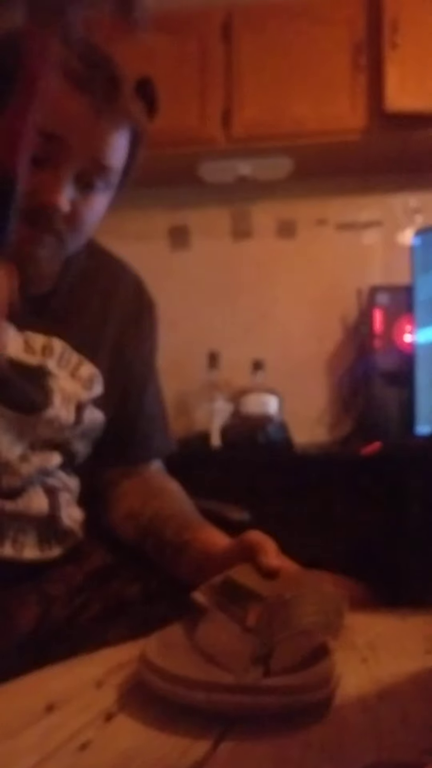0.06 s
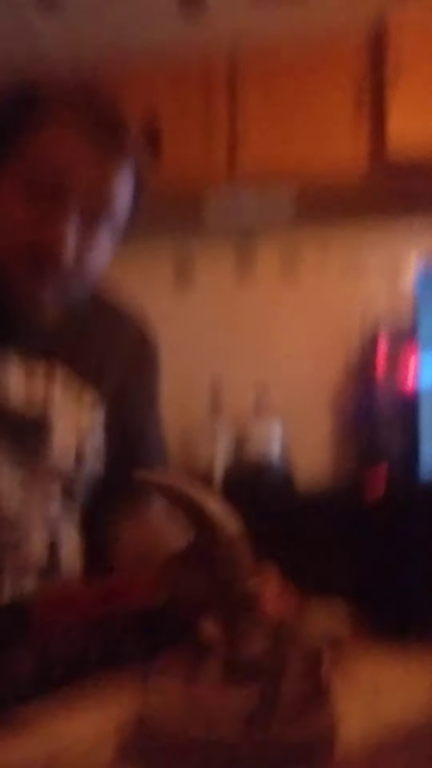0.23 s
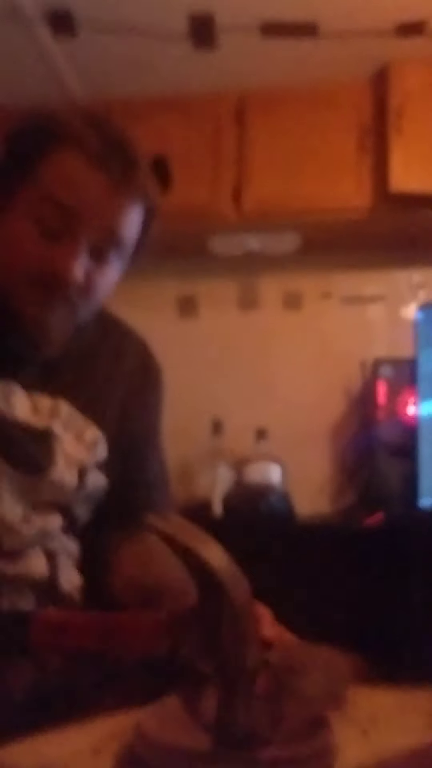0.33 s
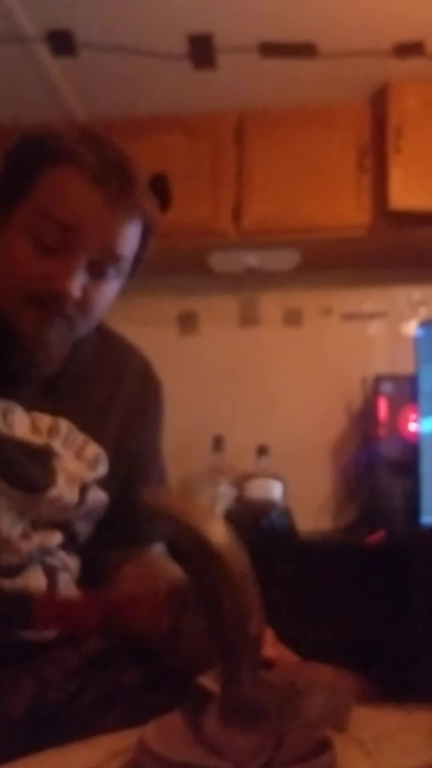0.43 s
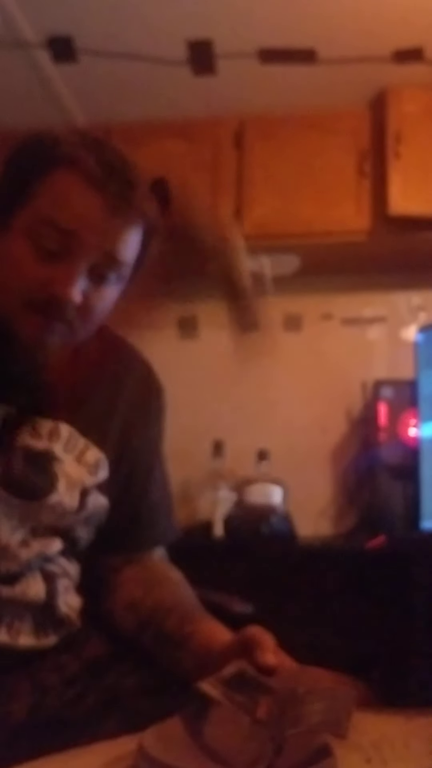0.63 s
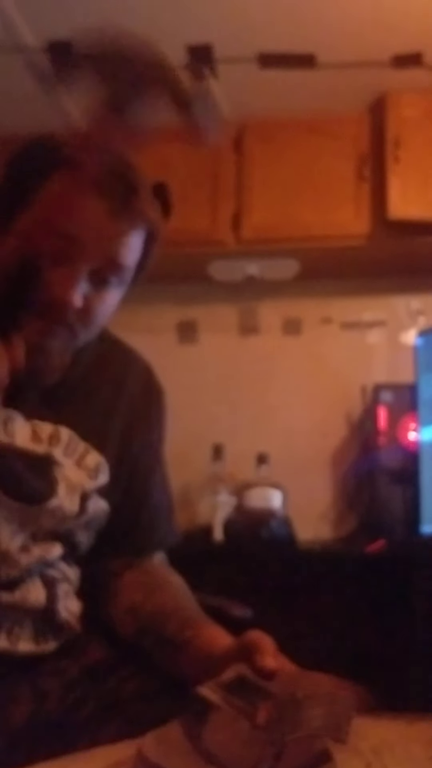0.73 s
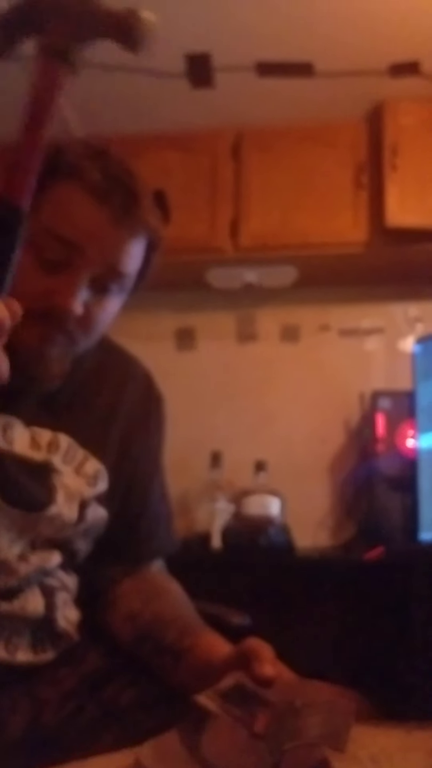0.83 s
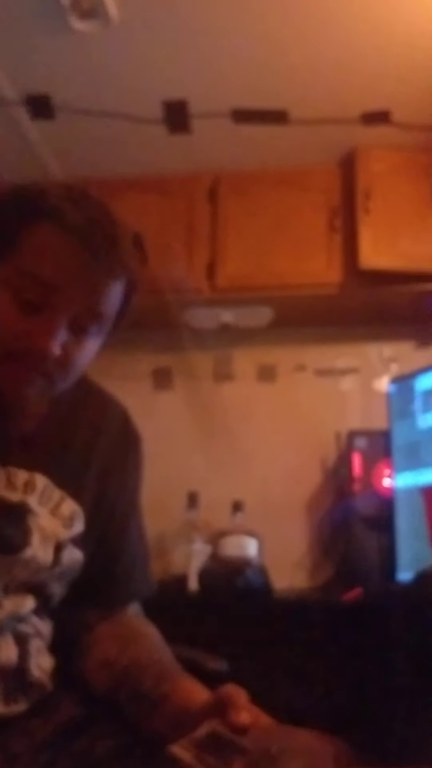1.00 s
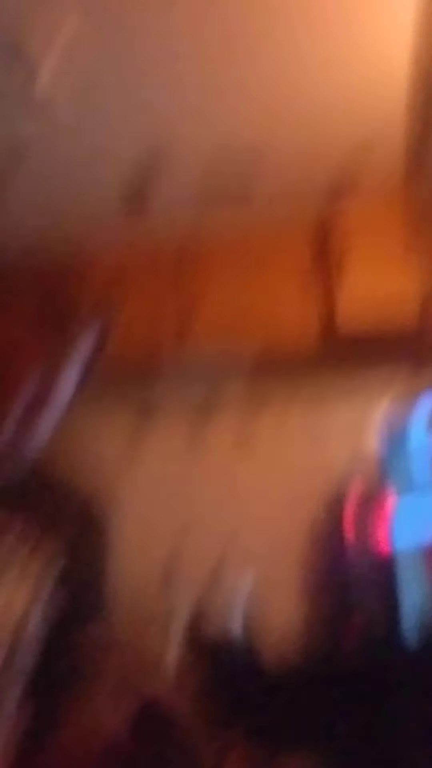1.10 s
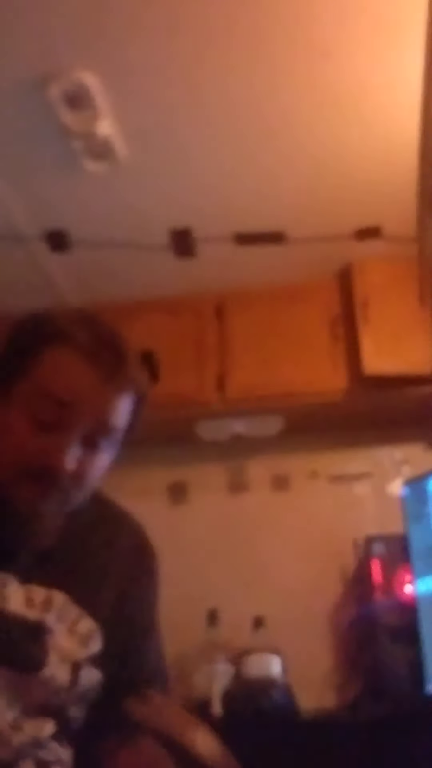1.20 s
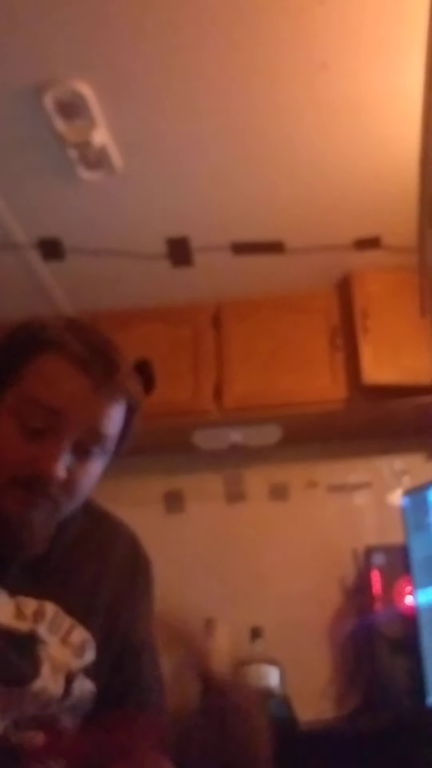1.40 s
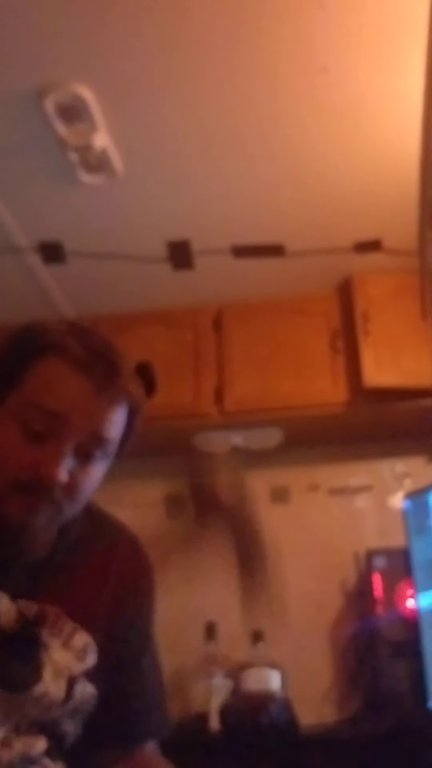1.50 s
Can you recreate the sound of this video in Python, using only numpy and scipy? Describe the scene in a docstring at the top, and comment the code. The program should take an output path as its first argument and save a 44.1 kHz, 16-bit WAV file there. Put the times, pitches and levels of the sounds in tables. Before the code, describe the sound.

A hammer hits a rubber sandal on a wooden table at about 0.2 seconds, a close, sharp slapping thud with a short boom in the small room. Loose things tick and bump faintly as they settle. A second, similar blow lands at about 1.1 seconds, followed by light rattling that dies away by 1.5 seconds. A faint low room rumble runs underneath.

```python
"""A small quiet kitchen: close by, a hammer comes down twice on a rubber sandal on a wooden table.
Each impact slaps the sole and drives the table's normal modes with two pushes, the second as the
sole bottoms out. Boards and near walls clatter, the room's standing waves boom, small metal rings.
Loose things then tick and bump softly as they settle, over a low steady room rumble."""
import sys
import numpy as np
from scipy import signal
from scipy.fft import rfft, irfft, next_fast_len
from scipy.io import wavfile
from scipy.ndimage import uniform_filter1d

SR = 44100
rng = np.random.default_rng(int(sys.argv[2]) if len(sys.argv) > 2 else 0)


def wav_record(signal):
    """Record a signal, one row per channel, as 16-bit PCM in the file named by sys.argv[1]."""
    frames = np.transpose(np.atleast_2d(signal))
    bounded = np.clip(frames, -1, 1)
    # unit amplitude maps onto the largest positive 16-bit level
    quanta = np.round(bounded * 32767).astype(np.int16)
    wavfile.write(sys.argv[1], SR, quanta)


N = 68355
T = np.arange(N) / SR
BANDS_HZ = 31.25 * 2 ** (np.arange(28) / 3)


def undb(db):
    """Amplitude ratio of a level in decibels."""
    return 10 ** (np.asarray(db) / 20)

def pan(db):
    """Interaural level difference: two gains, the left `db` above the right."""
    return undb(np.array([[db], [-db]]) / 2)

def band_values(table, column=1):
    """A table column interpolated at the band centres on a log-frequency axis."""
    table = np.array(table, float)
    return np.interp(np.log(BANDS_HZ), np.log(table[:, 0]), table[:, column])

def fade(t60, hold_s=0):
    """Exponential decay after a hold: 60 dB in t60 seconds."""
    return np.exp(-np.log(1000) * np.maximum(T - hold_s, 0) / t60)

def rise(seconds):
    """Smooth onset: the complement of a Gaussian."""
    return 1 - np.exp(-(T / seconds) ** 2)

def delayed(x, seconds):
    """Pure time delay."""
    k = round(seconds * SR)
    return np.concatenate([np.zeros(x.shape[:-1] + (k,)), x[..., :N - k]], axis=-1)

def noise_bands(coherent_hz=690, bass_correlation=0.83):
    """Unit third-octave noises (bands x 2 x N); interaural coherence falls above coherent_hz."""
    size = next_fast_len(N)
    hz = np.maximum(np.arange(size // 2 + 1) * SR / size, 1)
    mid, side = rfft(rng.standard_normal((2, size)))
    coherence = bass_correlation / (1 + (hz / coherent_hz) ** 4)
    ears = np.sqrt(1 + coherence) * mid + np.sqrt(1 - coherence) * side * np.array([[1], [-1]])
    passbands = np.cos(np.pi / 2 * np.clip(3 * np.log2(hz / BANDS_HZ[:, None]), -1, 1)) ** 2
    bands = irfft((passbands[:, None] * ears).astype(np.complex64), size)[..., :N]
    return bands / bands.std(axis=(1, 2), keepdims=True)

def colour(bands, db):
    """Spectral shaping: the bands summed at the given levels."""
    return np.tensordot(undb(db).astype(np.float32), bands, 1)

def ring(modes):
    """Free vibration: a superposition of damped modes (f/Hz, level/dB, T60/s)."""
    return sum(undb(db) * np.sin(2 * np.pi * hz * T) * fade(t60) for hz, db, t60 in modes)

def room_rumble(rms_db=-57):
    """Stationary background noise with its energy in the bass."""
    # spectral density of the rumble: f/Hz, relative level/dB
    density = [(30, 0.5), (60, 4.5), (100, -2), (160, -4), (250, -7), (330, -17), (480, -13), (750, -30),
               (1200, -37), (2200, -34), (3200, -44.5), (6000, -43), (8500, -63), (16000, -65)]
    bandwidth_db = 10 * np.log10(BANDS_HZ)
    rumble = colour(noise_bands(coherent_hz=1200), band_values(density) + bandwidth_db)
    return undb(rms_db) * rumble / rumble.std()

def sole_slap(bands, tilt):
    """Impact of hammer on rubber: a broadband transient and a crack of heavily damped modes."""
    # spectrum of the slap: f/Hz, band level/dB
    spectrum = [(100, -45.5), (300, -27), (900, -11.5), (1600, -11.5), (2700, -6.5), (4500, -12.5),
                (6500, -20.5), (8500, -30.5), (12500, -8.5), (16000, -21.5)]
    # crack of the hammer face on the sole: f/Hz, level/dB, T60/s
    crack_modes = [(2640, -7.5, 0.011), (2947, -5, 0.0084), (4476, -12, .012)]
    burst = colour(bands, band_values(spectrum) + tilt) * fade(t60=0.0077)
    return (burst + ring(crack_modes)) * rise(0.0021) * pan(-15)

def lumps(depth_db=1.5, steps_per_s=500):
    """Random amplitude modulation of unit mean power."""
    step = int(SR / steps_per_s)
    stairs = np.repeat(rng.standard_normal(N), step)[:N]
    gain = undb(depth_db * uniform_filter1d(stairs, step))
    return gain / np.sqrt(np.mean(gain ** 2))

def clatter(bands, tilt):
    """Modal overlap: boards and near walls ring as uneven noise, then the room reverberates."""
    # dense ringing and its tail: f/Hz, early level/dB, tail level/dB, tail T60/s
    spectrum = [(39.6, -47.5, -52, 0.94), (120, -39.5, -35.5, .72), (280, -28.5, -34, 0.5),
                (463, -23, -33, 0.62), (1000, -29.5, -40.5, 0.59), (1600, -25.5, -34.5, .42),
                (2600, -26, -35, .38), (3600, -32.5, -33.5, .37), (5000, -29, -38, 0.41),
                (6340, -33, -44, .32), (8000, -47.5, -58.5, .33), (12500, -44.5, -55, .35),
                (16000, -44, -61.5, .28)]
    early_db, tail_db, tail_t60 = (band_values(spectrum, column) for column in (1, 2, 3))
    early = colour(bands, early_db + tilt) * rise(0.003) * fade(t60=0.19, hold_s=0.024) * lumps()
    decays = np.array([fade(t60) for t60 in tail_t60], np.float32)[:, None]
    tail_noise = bands[..., ::-1]  # reversed, so uncorrelated with the early sound
    tail = colour(tail_noise * decays, tail_db + tilt) * rise(0.025)
    return (early + tail) * pan(-0.5)

def metal_jingle(spread_hz=14, scatter_db=5.5):
    """Beats: small metal rings in mistuned pairs of partials, drawn anew for each blow and ear."""
    # modes of the metal: f/Hz, level/dB, T60/s
    modes = [(5230, -50, 0.34), (12470, -55.5, 0.53), (12680, -56.5, .4), (12900, -57, .47),
             (13050, -56.5, .36), (13380, -51, .28), (13700, -59.5, .3), (14770, -60, .33)]
    ears = []
    for draws in rng.standard_normal((2, 2 * len(modes), 2)):
        ears.append(ring((hz + spread_hz * detune, db + scatter_db * scatter, t60)
                         for (hz, db, t60), (detune, scatter) in zip(2 * modes, draws)))
    return np.array(ears) * rise(0.025)

def table_thump():
    """Forced response: half-sine force pulses convolved with the table's impulse response."""
    # the shove, then the sole bottoming out: delay t/s, contact t/s, impulse level/dB
    pushes = [(.002, 0.0018, 0.5), (.0089, .0011, -9)]
    # modes of the table top: f/Hz, level/dB, T60/s, left minus right/dB
    modes = [(50, -24, 0.29, -12.5), (76, -17.5, .2, -17), (106.3, -32, 0.55, -6.5),
             (156.3, -21.5, 0.19, -15), (173.2, -20.5, 0.3, -7), (254, -13, .1, -8.5),
             (253.1, -23.5, 0.37, -5.5), (345, -14, 0.058, -11), (381, -16.5, 0.19, -5.5),
             (440.2, -17.5, .18, -2.5), (518, -32, .25, -6), (663.4, -15, 0.1, -1.5),
             (820, -16.5, .15, -5.5), (1232, -16.5, 0.14, -1), (1642, -12, 0.21, 2),
             (1873, -17.5, .26, 1.5), (2800, -14.5, 0.27, -2.5)]
    force = 0
    for delay, contact, db in pushes:
        push = np.sin(np.pi * np.minimum(T / contact, 1))
        force = force + delayed(undb(db) * push / push.sum(), delay)
    response = sum(ring([(hz, db, t60)]) * pan(pan_db) for hz, db, t60, pan_db in modes)
    return signal.fftconvolve(force[None], response, axes=1)[:, :N]

def room_boom():
    """Room resonance: low standing waves swell just after the impact."""
    # standing waves: f/Hz, level/dB, T60/s
    modes = [(73.8, -10.5, 0.32), (88, -24, .45), (135.3, -30.5, 0.69), (162.3, -23.5, 0.54)]
    return delayed(ring(modes) * rise(0.04), seconds=0.022) * pan(-6)

def hammer_blows(shared_power=0.67):
    """Superposition of all that each impact excites; the blows share part of their noise."""
    # blows: t/s, thump level/dB, slap level/dB, clatter level/dB, tilt/(dB per octave)
    blows = [(0.2003, 0.5, 0.5, -1.5, -2), (1.0637, -0.5, -4, -0.5, -1.5)]
    body = table_thump() + room_boom()
    common = noise_bands()
    out = 0
    for start, thump_db, slap_db, clatter_db, slope in blows:
        bands = shared_power ** 0.5 * common + (1 - shared_power) ** 0.5 * noise_bands()
        tilt = slope * np.log2(BANDS_HZ / 1000)
        blow = undb(slap_db) * sole_slap(bands, tilt) + undb(thump_db) * body
        blow += undb(clatter_db) * clatter(bands, tilt) + metal_jingle()
        out = out + delayed(blow, start)
    return out

def loose_ticks(bands, reverb_db=-20.5):
    """Brief contacts give wide spectra: loose things land with a sharp tick and a short clink."""
    # landings: t/s, level/dB, tilt before limiting/(dB per octave)
    landings = [(0.2358, -18, 0.5), (0.2429, -22, 5.5), (0.2525, -27.5, -1), (0.2734, -34.5, 3),
                (0.3038, -34.5, 6.5), (0.3203, -56, -9.5), (0.4391, -49.5, -1.5), (0.5157, -55, -7.5),
                (0.5371, -55.5, -5), (1.0989, -16.5, -1.5), (1.1061, -19, 5.5), (1.1493, -33, -7),
                (1.185, -46, 16), (1.2063, -46.5, 5), (1.248, -46, 3), (1.2768, -55, 3), (1.3091, -44, 1),
                (1.3134, -54, 1), (1.3509, -47, -6), (1.3831, -56.5, -5), (1.408, -59, -9.5)]
    # spectrum of a tick: f/Hz, band level/dB
    spectrum = [(40, -65), (700, -25.5), (2000, -6.5), (4500, -8.5), (6400, -13), (8000, -29.5),
                (12500, -22), (16000, -25.5)]
    # modes of the loose things: f/Hz, level/dB, T60/s
    clink_modes = [(1937, -15, 0.11), (4582, -12.5, .025)]
    envelope = rise(0.00019) * (fade(t60=0.0063) + undb(reverb_db) * fade(t60=0.24))
    clink = ring(clink_modes)
    out = 0
    for start, db, slope in landings:
        tilt = np.clip(slope, -3, 5) * np.log2(BANDS_HZ / 4000)
        tick = colour(bands, band_values(spectrum) + tilt) * delayed(envelope, start)
        out = out + undb(db) * (tick + delayed(clink, start))
    return out * pan(-4.5)

def soft_bumps(bands):
    """Soft contacts excite mainly low frequencies: dull bursts of noise as things settle."""
    # bumps: t/s, level/dB
    bumps = [(.358, -46.5), (.428, -42), (.641, -53.5), (0.793, -59), (0.919, -60), (1.484, -64)]
    # spectrum of a bump: f/Hz, band level/dB
    spectrum = [(60, -9), (160, -8), (450, -3), (700, -10), (1200, -20), (2200, -27.5), (5000, -35),
                (9000, -44)]
    pulse = rise(0.0027) * fade(t60=0.23)
    envelope = sum(undb(db) * delayed(pulse, start) for start, db in bumps)
    return colour(bands, band_values(spectrum)) * envelope

def scene():
    """Linear superposition of the blows, the settling things and the rumble."""
    blows = hammer_blows()
    bands = noise_bands()
    return blows + loose_ticks(bands) + soft_bumps(bands) + room_rumble()

def record(dry, low_cut_hz=45, top_hz=15900):
    """Band limiting and soft saturation: deep bass is cut, peaks are rounded, the top is cut."""
    x = signal.sosfilt(signal.butter(4, low_cut_hz, "high", fs=SR, output="sos"), dry)
    rounded = x / (1 + x ** 6) ** (1 / 6)
    return signal.sosfilt(signal.ellip(10, 0.2, 70, top_hz, fs=SR, output="sos"), rounded)


dry = scene()
out = record(dry)
wav_record(out)
```